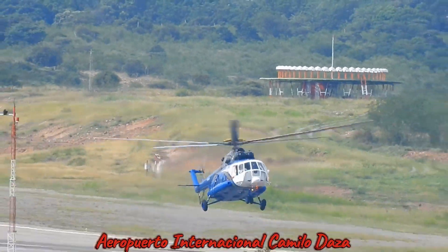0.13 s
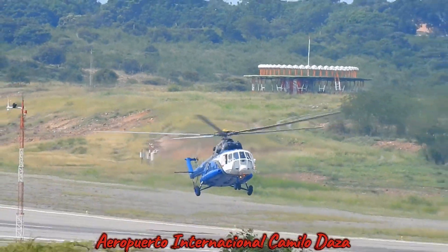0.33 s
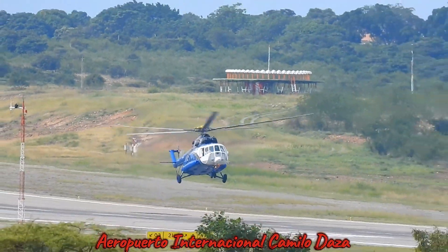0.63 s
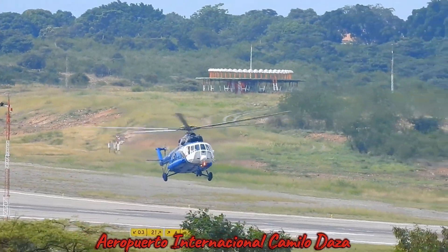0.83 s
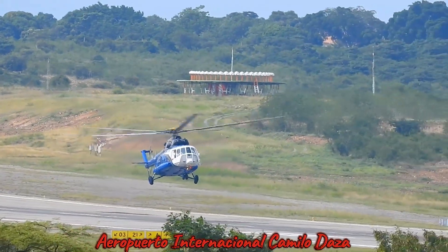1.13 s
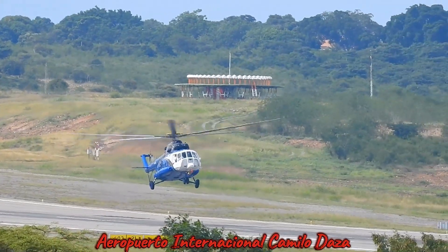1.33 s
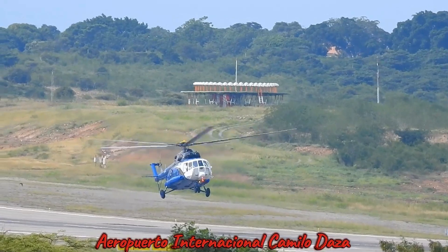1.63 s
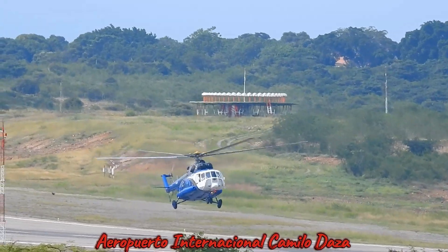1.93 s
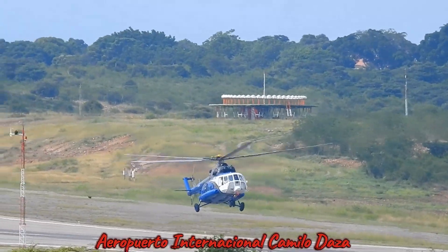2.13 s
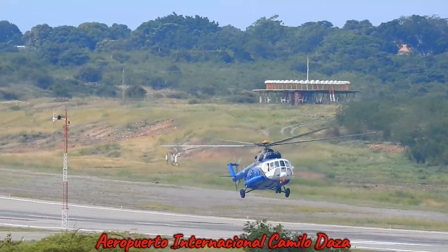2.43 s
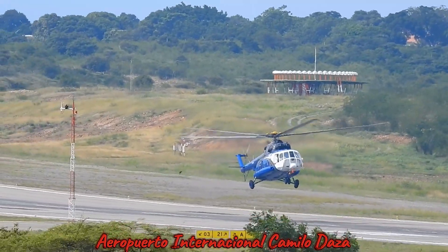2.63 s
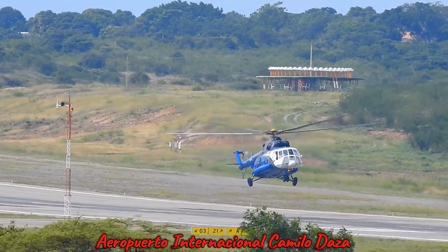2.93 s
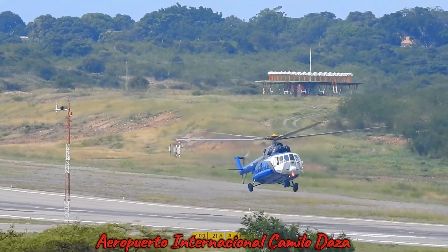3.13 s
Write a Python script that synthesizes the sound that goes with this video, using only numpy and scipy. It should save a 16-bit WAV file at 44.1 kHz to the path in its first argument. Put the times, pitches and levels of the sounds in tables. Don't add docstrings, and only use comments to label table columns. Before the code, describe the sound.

Helicopter rotor roar with rapid dull blade chops and tail buzz, wind buffeting the microphone.

```python
import sys
import numpy as np
from scipy import signal
from scipy.fft import rfft, irfft
from scipy.io import wavfile
from scipy.ndimage import uniform_filter1d

SR = 44100
rng = np.random.default_rng(int(sys.argv[2]) if len(sys.argv) > 2 else 0)


def gain_from_db(level_db):
    decades = np.asarray(level_db, float) / 20
    return 10 ** decades


def transcribe(u):
    v = np.clip(np.atleast_2d(u).T, -1, 1)
    q = np.round(v * 32767).astype(np.int16)
    wavfile.write(sys.argv[1], SR, q)


N = 145530
T = np.arange(N) / SR
HZ = np.maximum(np.fft.rfftfreq(N, 1 / SR), 1)
OPPOSED = np.array([[1], [-1]])

# start_s, roar_level_db, throb_depth (0-1), tail_level_db, tilt_db_per_octave
ROTOR_LOAD = [(0, -20, 0, -7, 1), (.11, -22, 0.6, 1.5, 1.5), (.3, -21, 0.64, -3.5, 1),
              (.6, -21.5, 0.4, -8.5, 0), (.85, -22.5, 0, -2, 0.5), (1.0, -22.5, 0.6, 5, -0.5),
              (1.3, -24, 0.6, -1, 0), (1.55, -25, 0.4, 1, 1), (1.8, -23, 0.37, 2.5, 0.5),
              (2.0, -24, 0.5, 0.5, -0.5), (2.2, -22.5, .2, -3, .5), (2.4, -23.5, 0.04, -0.5, 0.5),
              (2.7, -26, 0.23, -22, 0.5), (2.98, -23.5, 0.68, -15, 0.5), (3.3, -25, 0.5, -18, 0)]
# freq_hz, density_db
TURBULENCE = [(53, -54.5), (90, -14), (150, -7), (412, -0.5), (540, -1), (721, -6.5), (1190, -16.5),
              (1440, -20), (2080, -27.5), (9000, -70), (11700, -71), (19800, -120)]


def unit(x):
    return x / np.sqrt(np.mean(x ** 2))


def curve(table, col):
    points = np.array(table)
    return np.interp(T, points[:, 0], points[:, col])


def shape(points):
    hz, db = np.array(points).T
    return gain_from_db(np.interp(np.log(HZ), np.log(hz), db))


def bell(hz, width_hz):
    return np.exp(-.5 * ((HZ - hz) / width_hz * 2) ** 2)


def colour(x, gain):
    return irfft(rfft(x) * gain, N)


def walk(rate):
    hold = int(SR / rate)
    steps = np.repeat(rng.standard_normal(N // hold + 1), hold)
    return 1.36 * uniform_filter1d(uniform_filter1d(steps, hold), hold)[:N]


def bumps(table):
    return sum(gain_from_db(db) ** 2 * np.exp(-(2 * (T - s) / length_s) ** 2) for s, length_s, db in table)


def microphone_hiss():
    # freq_hz, density_db
    hiss = [(500, -34.5), (1000, 5), (2000, 1), (4000, -3.5), (6500, 0), (7500, -8), (9000, -15.5),
            (15500, -25.5)]
    return unit(colour(rng.standard_normal((2, N)), shape(hiss))) * gain_from_db(-48 + 0.68 * walk(17))


def lens_motor():
    rub = bell(7280, 970) + 0.25 * bell(8900, 1500)
    motor = unit(colour(rng.standard_normal((2, N)), rub)) * gain_from_db(-56.5)
    whine = unit(colour(rng.standard_normal(N), bell(7600, 260))) * gain_from_db(-66)
    motor = motor + whine * np.array([[1], [-.5]])
    stop_s, fade_s = 0.81, .05
    running = 1 / (1 + np.exp((T - stop_s) / fade_s))
    nudge_s, nudge_length_s, nudge_db = 1.47, 0.13, -4
    nudge = gain_from_db(nudge_db) * np.exp(-(2 * (T - nudge_s) / nudge_length_s) ** 4)
    return motor * (running + nudge)


def short_ticks():
    tick_s = [.230, .2935, .876, .8795, 1.40, 1.7815, 2.97]
    # level_db, centre_hz, decay_s
    ticks = [(-57, 12500, .008), (-49, 12000, .004), (-48, 6500, .016), (-39, 5800, .004), (-70, 7000, .03),
             (-54, 9000, .0015), (-52, 3800, .005)]
    out = 0
    for s, (db, hz, decay_s) in zip(tick_s, ticks):
        fall = (T >= s) * np.exp(-np.maximum(T - s, 0) / decay_s)
        gain = bell(hz, .7 * hz)
        burst = colour(rng.standard_normal((2, N)) * fall, gain)
        out = out + burst * gain_from_db(db) / np.sqrt(np.mean(gain ** 2))
    return out


def camera():
    return microphone_hiss() + lens_motor() + short_ticks()


def wind():
    # centre_s, length_s, level_db, left_minus_right_db
    buffets = [(0.015, 0.013, -11, 8), (0.122, 0.16, -29, 0), (0.232, 0.037, -17.5, -2),
               (0.311, 0.1, -32, 24), (0.356, 0.15, -27, -4), (0.46, 0.014, -37, 5),
               (0.532, 0.022, -31, 1.5), (0.623, 0.16, -32.5, -6.5), (0.832, 0.017, -36, -8),
               (1.095, 0.12, -35, 10.5), (1.185, 0.025, -17.5, -2.5), (1.257, 0.07, -22.5, 1),
               (1.389, 0.056, -19.5, 0.5), (1.521, 0.019, -24.5, -5.5), (1.637, 0.067, -32, 0),
               (1.763, 0.091, -33, -0.5), (1.844, 0.031, -33, 9), (2.022, 0.1, -33, 13),
               (2.063, 0.19, -39, -1.5), (2.31, 0.13, -28, -1.5), (2.53, 0.098, -37.5, 2.5),
               (2.751, 0.028, -22, -1.5), (3.039, 0.026, -20, 0), (3.096, 0.1, -30, -11.5),
               (3.185, 0.068, -31, 17.5), (3.277, 0.046, -23, 5.5)]
    # freq_hz, density_db
    gust_spectrum = [(30, -14), (95, -6), (190, 6), (300, -1.5), (560, -16), (900, -34.5), (1500, -30),
                     (3000, -66)]
    # centre_s, length_s, level_db
    thuds = [(.24, 0.069, -46), (.54, 0.13, -44), (.95, 0.13, -35), (1.3, 0.087, -46), (1.64, 0.11, -47),
             (2.62, 0.19, -34), (2.8, 0.21, -28.5), (3.14, 0.2, -35.5)]
    breeze_db, flutter_db, rumble_db = -44, 3, -52
    flutter = gain_from_db(flutter_db * np.clip([walk(40), walk(40.03)], -2, 1))
    gusts = unit(colour(rng.standard_normal((2, N)), shape(gust_spectrum))) * flutter
    gusts = gusts - 0.15 * gusts[::-1]
    gusts = gusts * np.sqrt(gain_from_db(breeze_db) ** 2 + bumps([b[:3] for b in buffets]))
    side_db = sum(side * np.exp(-(2 * (T - s) / length_s) ** 2) for s, length_s, _, side in buffets)
    gusts = gusts * gain_from_db(side_db * .5 * OPPOSED)
    low = unit(colour(rng.standard_normal(N), bell(54, 46)))
    low = low + .5 * low[::-1] * OPPOSED
    return gusts + low * np.sqrt(gain_from_db(rumble_db) ** 2 + bumps(thuds))


def wavering_tone(hz, level_db, break_rate, ceiling):
    tone = np.sin(2 * np.pi * np.cumsum(hz) / SR)
    return tone * gain_from_db(level_db + 6 * np.minimum(walk(break_rate), ceiling))


def gearbox():
    # start_s, pitch_hz, level_db
    gear = [(0, 1858, -52), (.17, 1860, -46), (.6, 1860, -52), (1.3, 1862, -56), (1.7, 1875, -53),
            (2.0, 1870, -57), (2.15, 1872, -47), (2.45, 1872, -51), (2.7, 1872, -56), (2.92, 1882, -49),
            (3.3, 1880, -51)]
    # pitch_hz, level_db, waver_hz
    streaks = [(1400, -52, 35), (2275, -63, 28), (3023, -64, 45), (3700, -68, 35)]
    out = 0
    for hz, db, waver_hz in streaks:
        out = out + wavering_tone(hz + waver_hz * walk(rate=30), db, 18, 1)
    return out + wavering_tone(curve(gear, col=1) + 15 * walk(rate=40), curve(gear, col=2), 28, .5)


def tail_rotor():
    # centre_hz, width_hz, level_db
    bands = [(368, 510, -3), (734, 217, 5.5), (920, 360, -0.5), (1440, 150, -21), (3100, 1500, -30)]
    blade_hz, first_s, jitter_s, scatter_db = 56.06, .011, .0012, 2.2
    at, out = np.arange(first_s, 3.28, 1 / blade_hz), 0
    for hz, width_hz, db in bands:
        chance = np.clip(rng.standard_normal((256, 2))[:len(at)], -2, 2)
        place = np.abs((at + jitter_s * chance[:, 0]) * SR).astype(int)
        pulses = np.zeros(N)
        pulses[place] = gain_from_db(scatter_db * (chance[:, 1] + walk(rate=7.06)[place]))
        out = out + gain_from_db(db) * unit(colour(pulses, bell(hz, width_hz)))
    return unit(out) * gain_from_db(-7 + curve(ROTOR_LOAD, col=3))


def blade_slaps():
    # start_s, peak_db, ring_hz
    deep = [(0.078, -5, 670), (0.097, -9.5, 337), (0.129, -6, 442), (.132, -13.5, 745), (0.162, -3.5, 304),
            (0.222, -10, 266), (.225, -13, 677), (.258, -10, 649), (0.288, -7, 175), (.346, -12, 752),
            (0.364, -4.5, 233.5), (0.405, -16.5, 390), (.484, -9, 285), (.495, -11.5, 770),
            (.901, -19, 677), (.908, -9.5, 303), (.953, -14, 742), (0.989, -9, 700), (1.007, -16.5, 750),
            (1.047, -10.5, 291), (1.096, -15, 300), (1.162, -22, 353), (1.223, -15, 748),
            (1.256, -15.5, 753), (1.262, -8.5, 192), (1.286, -7, 448), (1.403, -23, 770), (1.461, -7, 462),
            (1.587, -10.5, 240), (1.59, -6.5, 402), (1.594, -16, 786), (1.654, -8.5, 481), (1.719, -6, 420),
            (1.777, -1.5, 415), (1.828, -11.5, 718), (1.839, -5.5, 426), (1.901, -6.5, 411),
            (1.902, -11.5, 213), (1.956, -14, 737), (2.037, -19, 395), (2.076, -14, 700),
            (2.141, -10.5, 227), (2.166, -16, 686), (2.204, -19.5, 303), (2.462, -9, 225),
            (2.522, -11.5, 232), (2.586, -11, 206), (2.589, -14, 714), (2.679, -10.5, 230),
            (2.739, -15, 288), (2.826, -12, 199), (2.892, -13.5, 298), (2.968, -12, 204),
            (3.032, -9.5, 663), (3.035, -15, 277), (3.093, -14.5, 680), (3.155, -9.5, 649),
            (3.215, -11, 650), (3.278, -11, 699), (3.284, -10.5, 200)]
    # start_s, peak_db, ring_hz
    chops = [(0.0445, -17.5, 1570), (0.095, -16.5, 1380), (0.1151, -17, 1370), (0.1673, -17.5, 1370),
             (0.228, -29, 1350), (0.2784, -15, 1465), (0.386, -41, 1500), (0.4204, -21, 1387),
             (0.4722, -20, 1310), (0.6759, -25, 1520), (0.9562, -31, 1260), (1.1156, -23, 1390),
             (1.2246, -21, 1453), (1.324, -23.5, 1300), (1.4381, -26, 1420), (1.5389, -24, 1380),
             (1.703, -25, 1300), (1.7215, -21.5, 1284), (1.7744, -28, 1420), (2.83, -23, 1400),
             (3.034, -25, 1530), (3.091, -30, 1440), (3.222, -27, 1475), (3.2814, -23, 1427)]
    rise_s, cycles, crack_db, crack_s = .0038, 4.3, -17, .009
    size = 4096
    out, u = np.zeros(N + size), np.arange(size) / SR
    bright = bell(540, 2200) + 1.95 * bell(3440, 1200)
    crack = unit(colour(rng.standard_normal(N), shape(TURBULENCE) * np.sqrt(HZ) * bright))
    for (s, db, hz), chance in zip([*deep, *chops], rng.standard_normal((128, 3))):
        i = int(s * SR)
        rise = 1 - np.exp(-(u / rise_s * np.sqrt(hz / 400)) ** 2)
        fall = np.exp(-u * np.sqrt(hz * 500) / cycles)
        ring = np.sin(2 * np.pi * hz * u + chance[0])
        overtone_hz = hz * (2.15 + .1 * chance[1])
        ring = ring + .16 * np.sin(2 * np.pi * overtone_hz * u + 2 * chance[2])
        rough = gain_from_db(crack_db) * np.resize(crack[i:], size) * np.exp(-u / crack_s)
        out[i:i + size] += gain_from_db(db) * rise * (ring * fall + rough)
    return out[:N]


def main_rotor_roar():
    blade_hz, blade_at_s = 16.1, 1.79
    swell_db, near_db, flicker_db = 1.2, 1.7, 1.5
    out, swell, near = 0, walk(3.73), walk(2.3)
    depth = np.clip(curve(ROTOR_LOAD, col=2), 0, 1.5)
    throb = np.cos(2 * np.pi * blade_hz * (T - blade_at_s)) * depth
    source = rfft(rng.standard_normal(N)) * shape(TURBULENCE)
    tilt = curve(ROTOR_LOAD, col=4)
    for hz in 70 * 2 ** (np.arange(30) / 4):
        near = .8 * near + .6 * walk(rate=5)
        db = swell_db * swell + near_db * near + flicker_db * walk(16) + 5 * throb
        db = db / (1 + (hz / 4500) ** 2) + tilt * np.log2(hz / 500)
        band = np.cos(np.pi / 2 * np.clip(4 * np.log2(HZ / hz), -1, 1)) ** 2
        out = out + gain_from_db(db) * irfft(source * band, N)
    scattered = unit(colour(rng.standard_normal(N), shape(TURBULENCE)))
    return (unit(out) + 0.035 * scattered * OPPOSED) * gain_from_db(0.5)


def scene():
    # centre_hz, width_hz, gain_db
    path = [(555, 69.5, -11), (1196, 105, -6), (2540, 280, -2.5), (3920, 190, -4.5), (2070, 140, -4.5),
            (4520, 1660, 6), (460, 22, 0), (3560, 980, 7), (6200, 840, 10)]
    far = (main_rotor_roar() + tail_rotor()) * gain_from_db(curve(ROTOR_LOAD, col=1))
    far = colour(far, gain_from_db(sum(db * bell(hz, width_hz) for hz, width_hz, db in path)))
    near = wind() + camera() * gain_from_db([[-.5], [.5]])
    return far + blade_slaps() + gearbox() + near


def top_cut(x):
    return signal.sosfilt(signal.butter(12, 15660, fs=SR, output="sos"), x)


def record(dry):
    low_cut_hz, overload = 52.6, .9
    cut = colour(dry, 1 / np.sqrt(1 + (low_cut_hz / HZ) ** 8))
    mix = cut / (1 + np.abs(cut / overload) ** 4) ** (1 / 4)
    return top_cut(mix)


dry = scene()
out = record(dry)
transcribe(out)
```